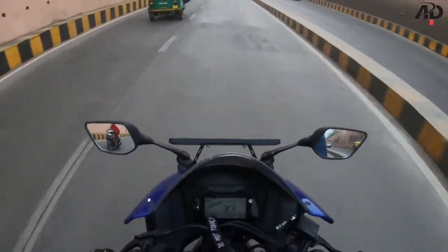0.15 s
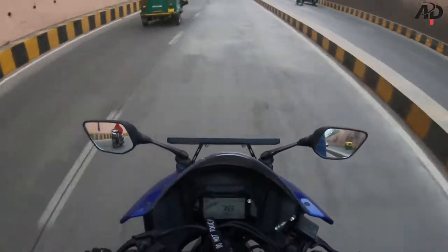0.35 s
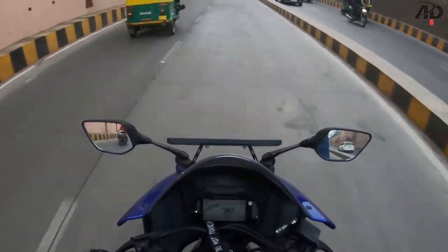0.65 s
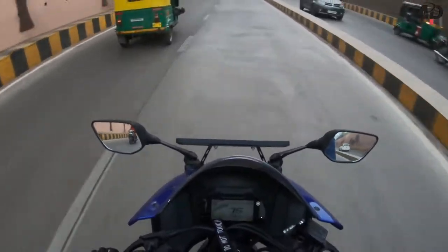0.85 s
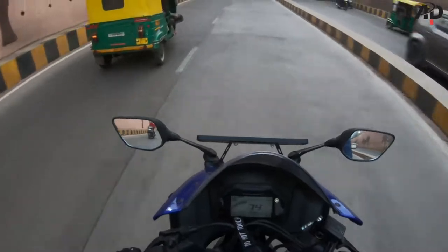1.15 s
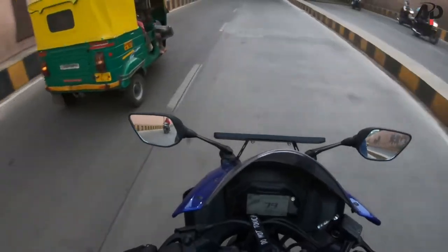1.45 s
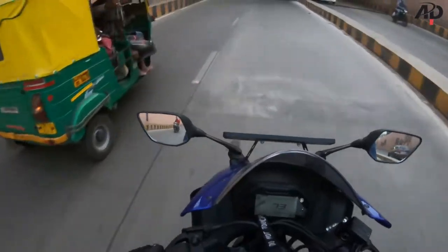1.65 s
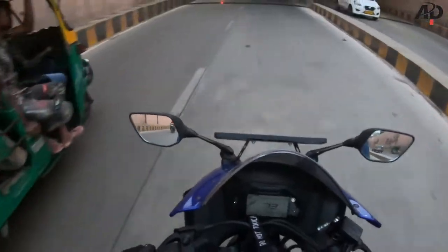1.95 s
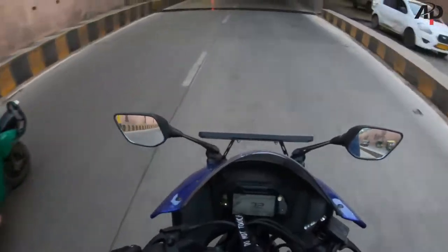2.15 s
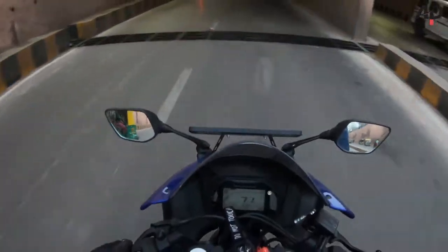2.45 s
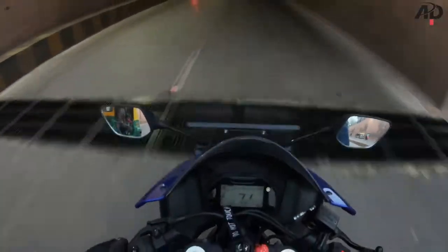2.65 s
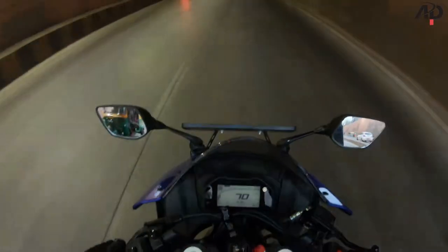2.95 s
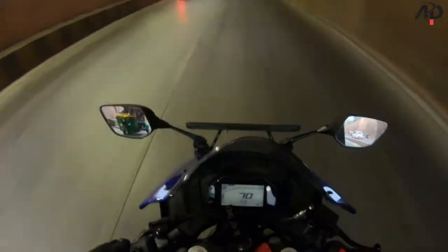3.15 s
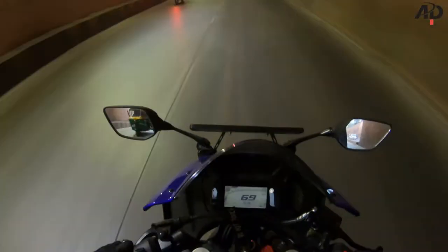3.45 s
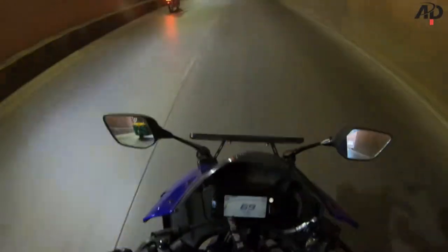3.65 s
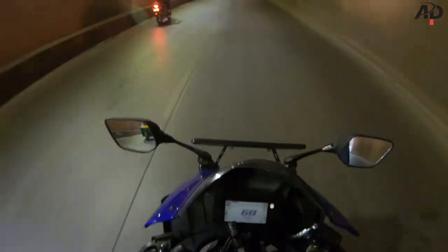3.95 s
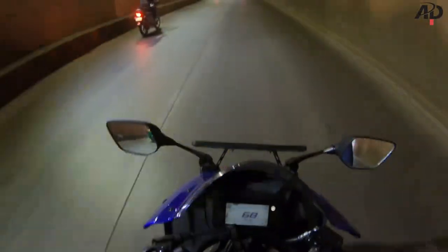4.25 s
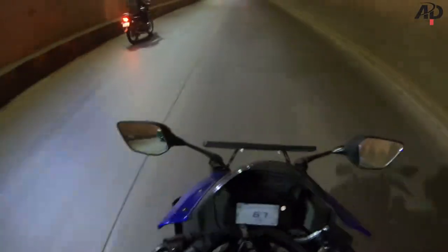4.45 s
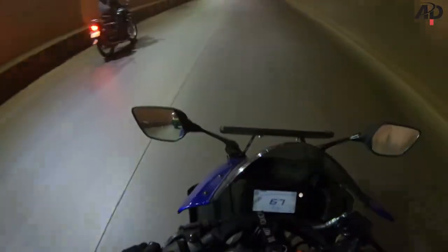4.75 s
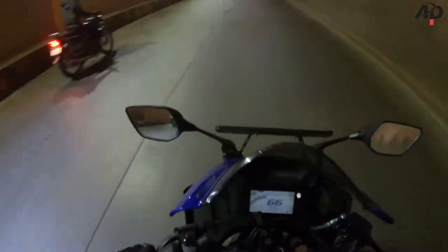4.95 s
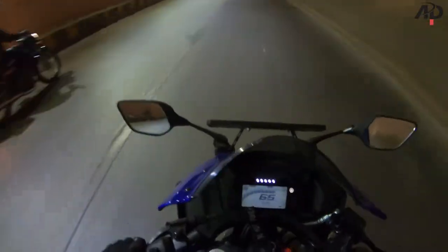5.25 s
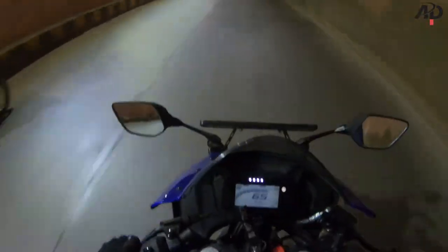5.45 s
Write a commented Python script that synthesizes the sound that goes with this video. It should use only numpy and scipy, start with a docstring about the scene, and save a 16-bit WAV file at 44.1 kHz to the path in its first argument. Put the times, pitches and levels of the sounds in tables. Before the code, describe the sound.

A motorcycle coasts down to a slow, lumpy idle under buffeting wind, then revs up hard with a raspy, echoing exhaust roar.

```python
"""Motorcycle revved in an underpass

A single-cylinder motorcycle coasts down to idle into an underpass, then is revved hard.
A helmet microphone, wired to the left channel only, hears exhaust blows ringing two resonators, engine
orders as steady tones, rasping gas, echo off concrete, shaped-noise wind and road, and metal rattles."""
import sys
import numpy as np
from scipy import signal
from scipy.io import wavfile
from scipy.ndimage import uniform_filter1d, map_coordinates

SR = 44100
rng = np.random.default_rng(int(sys.argv[2]) if len(sys.argv) > 2 else 0)


def generate_wav(signal):
    """Clip the signal to [-1, 1] and save it as 16-bit WAV at the path in sys.argv[1]."""
    frames = np.transpose(np.atleast_2d(signal))
    scaled = np.clip(frames, -1, 1) * 32767
    pcm = np.round(scaled).astype(np.int16)
    wavfile.write(sys.argv[1], SR, pcm)


N = 246959


def gain_of(db):
    """dB to gain."""
    return 10 ** (np.asarray(db) / 20)


def evened(x):
    """Scales to rms 1."""
    return x / np.sqrt(np.mean(x ** 2) + 1e-20)


def read(points, hz):
    """Reads a spectrum table on a log-frequency axis."""
    f, value = np.transpose(points)
    return np.interp(np.log(hz + 1), np.log(f + 1), value)


def curves(rows):
    """Each column of a time table, sample by sample."""
    s, *columns = np.transpose(rows)
    return [np.interp(np.arange(N) / SR, s, c) for c in columns]


def noise(spectrum, size, patchy_db=0, flicker_db=0):
    """Random short-time spectra, rms 1, with drifting patches and a flicker shared by all bins."""
    frames, hz = 4 * N // size + 5, np.fft.rfftfreq(size, 1 / SR)
    a, b, patches = rng.standard_normal((frames, len(hz), 3)).T
    patches = uniform_filter1d(patches, size=9, axis=0)
    patches = evened(uniform_filter1d(patches, size=7, axis=1))
    flicker = evened(uniform_filter1d(rng.standard_normal(frames), size=3))
    level_db = read(spectrum, hz)[:, None] + patchy_db * patches + flicker_db * flicker
    z = (a + 1j * b) * gain_of(level_db)
    return evened(signal.istft(z, nperseg=size, noverlap=size - size // 4)[1][:N])


def chamber_answer():
    """Minimum-phase answer of the big chamber to one blow, suction first, unit energy."""
    # booming chamber, open end radiates no deep bass: freq_hz, relative_db
    chamber = [(20, -55.5), (47, -8.5), (62, -6.5), (78, 2), (92, 4), (108, -5), (125, -3), (150, -8),
               (185, -8), (240, -16.5), (400, -27), (900, -52), (4000, -120)]
    log_gain = read(chamber, abs(np.fft.fftfreq(2 ** 16, 1 / SR))) / 20 * np.log(10)
    minimum_phase = np.exp(np.conj(signal.hilbert(log_gain)))
    out = -np.fft.ifft(minimum_phase).real[:SR // 5]
    return out / np.linalg.norm(out)


def tail_pipe_answer():
    """Bark of the tail pipe to one blow: suction first, every mode dying at its width, unit energy."""
    # tail pipe modes: freq_hz, width_hz, relative_db
    modes = [(168, 26, -14), (239, 36, 4.5), (311, 58, 9.5), (366, 49, 3), (491, 10, 2), (650, 45, -8),
             (980, 95, -13), (1170, 60, -22), (1500, 49, -28)]
    rise_s = .00073
    t = np.arange(round(SR / 8)) / SR
    out = np.zeros(len(t))
    for hz, width_hz, db in modes:
        decay = np.exp(-np.pi * width_hz * t)
        out -= gain_of(db) * width_hz * decay * np.sin(2 * np.pi * hz * t + 1.93)
    out *= 1 - np.exp(-(t / rise_s) ** 2)
    out = signal.sosfilt(signal.butter(2, 110, "high", fs=SR, output="sos"), out)
    return out / np.linalg.norm(out)


def blows(turns, hz, throttle, strength_db, steady):
    """One blow per firing, uneven in time and size, rings chamber (boom) and tail pipe (bark)."""
    # slow running fires less evenly: firing_hz, size_db, timing_cycles
    uneven = [(10, 2.5, .04), (20, 1.2, .015), (45, .6, .008), (85, .8, .008)]
    boom_shut_db, boom_open_db, boom_merged_db = -28, -26.5, -20
    bark_shut_db, bark_open_db, bark_merged_db = -37, -29, -14
    # merged: drop of the single blows inside the note
    boom_db = boom_shut_db + (boom_open_db - boom_shut_db) * throttle + strength_db + boom_merged_db * steady
    bark_db = bark_shut_db + (bark_open_db - bark_shut_db) * throttle + strength_db + bark_merged_db * steady
    at = np.flatnonzero(np.diff(np.floor(turns)))
    rate_hz, size_db, timing_cycles = np.transpose(uneven)
    late, size, bite = rng.standard_normal((3, len(at)))
    size_db = np.interp(hz[at], rate_hz, size_db)
    delay = np.interp(hz[at], rate_hz, timing_cycles) * late * SR / hz[at]
    at = np.clip(at + delay.astype(int), 0, N - 1)
    same_rms = np.sqrt(SR / hz[at])  # slower firing, same rms
    boom, bark = np.zeros((2, N))
    boom[at] = gain_of(boom_db[at] + size_db * size) * same_rms
    bark[at] = gain_of(bark_db[at] + size_db * (size + bite)) * same_rms
    boom = signal.oaconvolve(boom, chamber_answer())[:N]
    return boom + signal.oaconvolve(bark, tail_pipe_answer())[:N]


def order_tones(turns, hz, throttle):
    """Low engine orders as steady tones, set by throttle and pitch, each wandering in level."""
    # exhaust gain on an order by its pitch, throttle shut and open: freq_hz, level_db
    note_shut, note_open = [(45, -35), (62, -42.5), (80, -21.5), (100, -20.5), (130, -22), (160, -26.5),
                            (200, -25), (270, -35), (340, -21), (410, -33.5), (600, -49)], [(35, -32), (55, -26), (62, -26), (68, -17), (74, -13.5),
                                               (79, -16), (81.5, -30), (85, -28), (93, -17), (112, -16),
                                               (128, -22), (150, -28), (168, -24), (240, -32), (280, -28),
                                               (300, -25), (312, -22), (324, -22), (334, -18), (345, -25),
                                               (370, -21), (410, -26), (450, -31), (490, -26), (530, -35),
                                               (580, -38), (660, -35), (760, -43), (900, -44), (1080, -45),
                                               (1180, -38), (1270, -48), (1500, -56)]
    # soft blows of a shut throttle, weak high orders, one entry per order from 1: level_db
    order_shut_db = [-11, 0.5, 1, -4.5, -7.5, -14, -16, -17, -15, -18, -18, -19, -20, -22, -24, -26]
    # lag behind the firing, open throttle, one entry per order from 1: lag_cycles (of that order)
    open_lags = [0.051, 0.101, 0.249, 0.451, .6, .7, .85, 0.949, 1.1, 1.2, 1.3, 1.4, 1.5, 1.6, 1.7, 1.8]
    # lag = a + b k + c k^2, throttle shut, pipe spreads the orders: a_cycles, b_cycles, c_cycles
    shut_lag = (.5, .375, -.125)
    wander_shut_db, wander_open_db, wander_s = .7, 2.8, .07
    drift_cycles, drift_s = .22, .16
    t, out = np.arange(N) / SR, np.zeros(N)
    wide = np.interp(throttle, (.4, .55), (0, 1))
    loose = drift_cycles * np.interp(hz, (58, 80), (0, 1))  # fast running: orders slide apart
    wander_db = np.interp(throttle, (0, 1), (wander_shut_db, wander_open_db))
    for k, (open_lag, soft_db) in enumerate(zip(open_lags, order_shut_db), 1):
        wander = map_coordinates(rng.standard_normal(200), [t / wander_s], order=1)
        drift = map_coordinates(rng.standard_normal(60), [t / drift_s], order=1)
        shut_db = read(note_shut, k * hz) + soft_db
        open_db = read(note_open, k * hz)
        db = (1 - throttle) * shut_db + throttle * open_db + wander_db * wander
        lag = (1 - wide) * (np.polyval(shut_lag[::-1], k) % 1) + wide * open_lag + loose * drift
        out -= np.sqrt(2) * gain_of(db) * np.cos(2 * np.pi * (k * turns - lag))
    return out


def escaping_gas(turns, hz):
    """Noise gated by a decaying puff per firing and a weaker one thrown back by the pipe."""
    # gas levels: start_s, rasp_db, bright_spit_db
    gas = [(0, -74, -90), (2.7, -69, -90), (4.4, -65, -72), (4.75, -45, -50), (4.85, -52, -48),
           (4.95, -35.5, -55), (5.05, -33, -42), (5.15, -34.5, -35), (5.25, -36, -40.5), (5.38, -38, -45),
           (5.48, -40.5, -45.5), (5.6, -41, -44)]
    # rasp spectrum: freq_hz, relative_db
    rasp_spectrum = [(150, -47), (400, -36), (700, 16.5), (1200, 20.5), (1800, 9), (2500, 6), (3300, -27),
                     (4200, -25), (6000, -39), (9000, -33), (16000, -92)]
    # bright spit spectrum: freq_hz, relative_db
    spit_spectrum = [(600, -25), (1100, 4.5), (1600, -5), (2200, -8), (3200, -10), (4000, -20),
                     (5500, -27.5), (9000, -47)]
    puff_s, steady_flow = .003, .3
    second_puff, second_puff_s = .35, .008
    since_s = (turns % 1) / hz
    late_s = since_s - second_puff_s
    late_puff = (late_s > 0) * np.exp(-late_s.clip(min=0) / puff_s)
    puffs = np.exp(-since_s / puff_s) + second_puff * late_puff
    gate = steady_flow + uniform_filter1d(puffs, size=60)
    gate = gate / np.sqrt(uniform_filter1d(gate ** 2, size=4096))
    rasp_db, spit_db = curves(gas)
    rasp = gain_of(rasp_db) * gate * noise(rasp_spectrum, size=256, flicker_db=1.2)
    spit = gain_of(spit_db) * gate ** 1.4 * noise(spit_spectrum, size=256, patchy_db=1, flicker_db=.4)
    return rasp + spit


def exhaust():
    """Firing phase drives blows and gas; fast blows merge into steady order tones."""
    # coasting down, idling, revving: start_s, firing_hz
    speed = [(0, 46.9), (.1, 44.9), (.35, 39.3), (.54, 43.6), (.65, 47.2), (.75, 49.4), (.95, 48),
             (1.15, 43.7), (1.38, 37.7), (1.77, 29.6), (2.13, 22.3), (2.45, 18.1), (2.7, 12.4), (3.3, 9.8),
             (4.1, 13.5), (4.3, 10.4), (4.52, 19.3), (4.68, 26), (4.75, 32.5), (4.9, 48), (5.12, 75.6),
             (5.2, 83.2), (5.26, 82.9), (5.36, 80.5), (5.55, 73.6)]
    # start_s, throttle (0-1), blow_strength_db
    effort = [(0, 0.1, -1), (.35, 0.07, -3), (.6, 0.14, 0), (1.0, 0.18, -2.5), (1.5, 0.29, -1.5),
              (2.0, 0, -3.5), (2.3, 0, -1), (2.5, 0.1, -7), (2.7, 0.35, -12.5), (3.4, 0.28, -12),
              (4.05, 0, 0), (4.28, 0, -10.5), (4.43, 0.17, 3.5), (4.56, 0.2, 6), (4.62, .55, 4),
              (4.67, .7, 6), (4.75, .74, 2.5), (4.82, .78, -.5), (4.9, .86, -1), (4.98, 0.88, 0),
              (5.08, 1, -2.5), (5.19, 1, -6.5), (5.28, 0.82, 1.5), (5.42, 1, -7), (5.6, 0.84, -3)]
    shut_merge_hz, open_merge_hz, merge_span_hz = 14, 32, 9  # merging starts here, over this span
    first_firing = .3  # share of a cycle already gone at the start
    hz, throttle, strength_db = curves(speed) + curves(effort)
    merge_hz = np.interp(throttle, (0, 1), (shut_merge_hz, open_merge_hz))
    steady = np.clip((hz - merge_hz) / merge_span_hz, 0, 1)
    turns = first_firing + np.cumsum(hz) / SR
    tones = steady * gain_of(strength_db) * order_tones(turns, hz, throttle)
    return blows(turns, hz, throttle, strength_db, steady) + escaping_gas(turns, hz) + tones


def concrete_tail():
    """Sparse taps of random sign, each band dying at its own speed, unit energy."""
    # concrete decay: freq_hz, t60_s
    concrete = [(60, 0.53), (300, 1), (1000, 0.21), (4000, 0.12)]
    taps = np.zeros(SR)
    at = np.arange(500, SR - 22, 22)
    taps[at + rng.integers(0, 22, len(at))] = rng.choice([-1., 1.], len(at))
    hz, t, z = signal.stft(taps, SR, nperseg=1024)
    decay_db = -60 * t / read(concrete, hz)[:, None]
    out = signal.istft(z * gain_of(decay_db), SR, nperseg=1024)[1]
    return out / np.linalg.norm(out)


def underpass(x):
    """The rider moves, so the echo pattern keeps changing: three tails take turns."""
    # walls, then the roof closes in: start_s, echo_db
    echo = [(0, -27), (2.4, -24), (2.8, -12), (4.5, -13), (5.1, -18), (5.6, -17)]
    t, out = np.arange(N) / SR, np.zeros(N)
    x = x * gain_of(curves(echo)[0])
    for k in range(3):
        turn = np.sqrt(2 / 3) * np.cos(np.pi * (1.5 * t + k / 3))
        out += signal.fftconvolve(x * turn, concrete_tail())[:N]
    return out


def buffet():
    """Short separate gusts push the wind cover, which yields only so far and evens the lumps."""
    # gust spectrum: freq_hz, relative_db
    gust_spectrum = [(1, -5), (3, 30), (7, 30.5), (11, 34.5), (16, -11), (25, -4), (100, -61), (1000, -150)]
    even_s, squash = .35, 1.1
    x = noise(gust_spectrum, size=16384)
    x = x / np.sqrt(uniform_filter1d(x ** 2, size=round(even_s * SR)) + .05)  # gusts of like strength
    return evened(np.tanh(squash * x))


def air():
    """Lumpy wind on the microphone, road and traffic roar, hiss and fizz, all shaped noise."""
    # start_s, buffet_db, wind_rumble_db, road_roar_db, tyre_wind_hiss_db, treble_fizz_db
    levels = [(0, -26.5, -24, -28.5, -44, -62.5), (.2, -23, -36, -27.5, -44.5, -61.5),
              (.55, -25, -32, -30, -45, -64), (1.1, -25, -32, -29.5, -45.5, -60.5),
              (1.35, -23, -28, -27.5, -45, -61), (1.8, -25.5, -29, -28, -44.5, -61),
              (2.2, -22, -26, -28, -43.5, -61), (2.7, -19.5, -28.5, -28, -44, -62),
              (3.1, -19.5, -25.5, -27.5, -43, -61), (3.8, -19, -29, -25, -42, -60.5),
              (4.1, -23, -23.5, -26.5, -43.5, -60.5), (4.55, -24.5, -27, -24, -41, -58.5),
              (4.9, -26, -40, -22.5, -47, -64), (5.25, -30, -48, -21.5, -49, -61),
              (5.6, -41, -34, -20.5, -45, -60.5)]
    # brief swells: centre_s, half_length_s, fizz_rise_db, other_air_rise_db
    swells = [(.7, 0.15, .5, 0.37), (.9, 0.052, 2, 2.6), (2.0, 0.061, 2.2, 0.16), (2.44, 0.07, 4.5, 3.9),
              (2.52, 0.024, 5.6, 0.44), (2.98, 0.056, 5.6, 1.3), (3.27, 0.038, 2.7, 0.64),
              (4.02, 0.027, 1.314, 1.6), (4.15, 0.074, 2.98, 3.4), (5.13, 0.051, 1.8, 0.64)]
    # spectra of the four noises: freq_hz, relative_db
    rumble_spectrum = [(8, 14.5), (18, -12), (30, 8.5), (45, 7.5), (60, -5.5), (80, 11), (150, -29),
                       (1500, -120)]
    roar_spectrum = [(20, -33), (50, -4), (80, 4), (120, -3), (200, -2.5), (290, -4), (400, -7),
                     (620, -12.5), (900, -19), (1500, -34), (2500, -75), (10000, -110)]
    hiss_spectrum = [(200, -63), (600, -12), (900, -7.5), (1150, 10.5), (1350, 3.5), (1700, -1),
                     (2350, 2.5), (3000, -3), (3600, -8.5), (4500, -13), (6000, -20), (8000, -30.5),
                     (16000, -73)]
    fizz_spectrum = [(1000, -50), (3000, -20), (6000, 0), (8000, -2), (10000, -4), (12500, -5), (16000, -8)]
    buffet_db, rumble_db, roar_db, hiss_db, fizz_db = curves(levels)
    s, half_s, fizz_rise_db, low_rise_db = np.transpose(swells)
    humps = np.exp(-((np.arange(N)[:, None] / SR - s) / half_s) ** 2)
    low = gain_of(buffet_db) * buffet()
    low += gain_of(rumble_db) * noise(rumble_spectrum, size=4096)
    low += gain_of(roar_db) * noise(roar_spectrum, size=1024, patchy_db=1.03, flicker_db=.2)
    low += gain_of(hiss_db) * noise(hiss_spectrum, size=512, patchy_db=1.12, flicker_db=1)
    fizz = noise(fizz_spectrum, size=256, patchy_db=1, flicker_db=.8)
    return gain_of(humps @ low_rise_db) * low + gain_of(fizz_db + humps @ fizz_rise_db) * fizz


def rattles():
    """Each knock is a burst of broad crack and a short ring of one small metal part."""
    # small parts knock: start_s, crack_db, dullness (0-1), ring_hz, ring_db, t60_s
    knocks = [(.85, -47, .2, 7970, -52, 0.018), (0.906, -54, .2, 8000, -49, 0.028),
              (1.6622, -25, .56, 7400, -44, 0.022), (1.9, -56, .2, 6920, -54, 0.033),
              (2.24, -45, 0.2, 11900, -53, 0.032), (2.515, -44, .2, 4700, -43, .03),
              (2.563, -58, .1, 12600, -43, 0.014), (2.702, -44, .1, 12400, -44, 0.026),
              (4.732, -46, .2, 4580, -45, 0.024)]
    out, t = np.zeros(N), np.arange(SR // 10) / SR
    for s, crack_db, dull, hz, ring_db, t60_s in knocks:
        crack = signal.lfilter([1, -1], [1, -.88], rng.standard_normal(len(t)))
        crack = signal.lfilter([(1 - dull) ** 2], [1, -2 * dull, dull ** 2], gain_of(crack_db) * crack)
        knock = crack + gain_of(ring_db) * np.sin(2 * np.pi * hz * t)
        envelope = gain_of(-60 * t / t60_s) * (1 - np.exp(-t / .001))
        out[round(s * SR):][:len(t)] += knock * envelope
    return out


def scene():
    """All sources add up at one microphone, at twice their set levels."""
    engine = exhaust()
    sound = engine + underpass(engine) + air() + rattles()
    return np.array([2 * sound, 0 * sound])  # the right input is unplugged


def record(dry):
    """Capsule chokes twice at full throttle; input blocks steady pressure, rounds peaks, limits band."""
    # overloaded capsule loses its treble: centre_s, half_length_s
    chokes = [(5.1497, .0012), (5.17, .0019)]
    choked_hz, block_hz, peak, edge_hz = 400, 1.5, 1.2, 15770
    s, half_s = np.transpose(chokes)
    choke = np.exp(-((np.arange(N)[:, None] / SR - s) / half_s) ** 4).sum(axis=1)
    dull = signal.sosfiltfilt(signal.butter(2, choked_hz, fs=SR, output="sos"), dry)
    choked = dry + choke * (dull - dry)
    passed = signal.lfilter([1, -1], [1, -np.exp(-2 * np.pi * block_hz / SR)], choked)
    soft = peak * np.tanh(passed / peak)
    band = signal.firwin(4095, edge_hz, window=("kaiser", 12), fs=SR)
    return signal.oaconvolve(soft, band[None], "same")


dry = scene()
out = record(dry)
generate_wav(out)
```